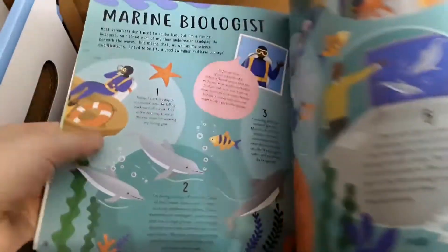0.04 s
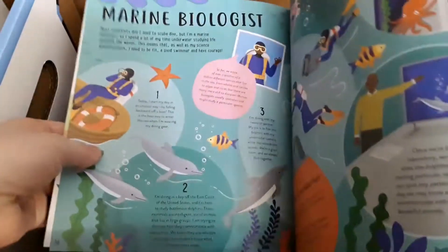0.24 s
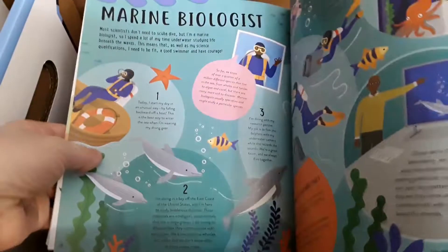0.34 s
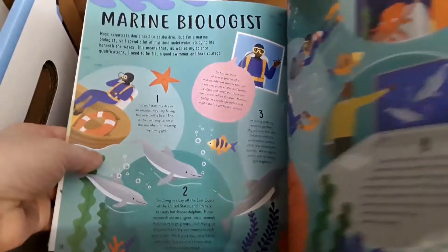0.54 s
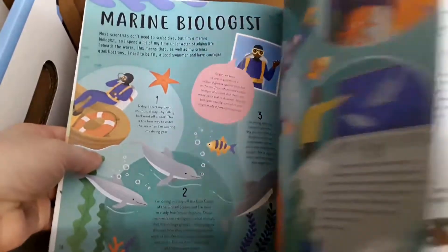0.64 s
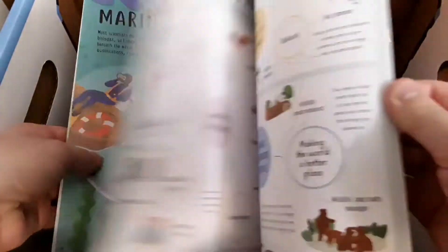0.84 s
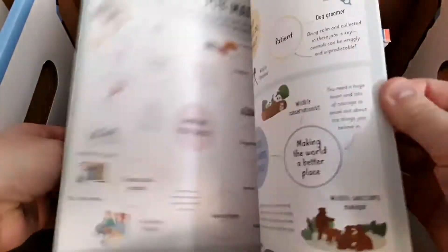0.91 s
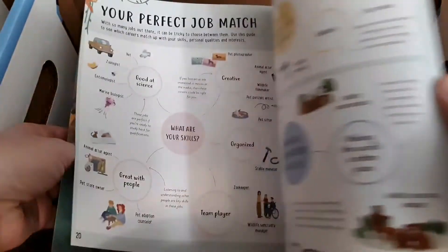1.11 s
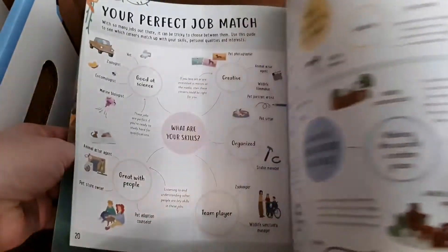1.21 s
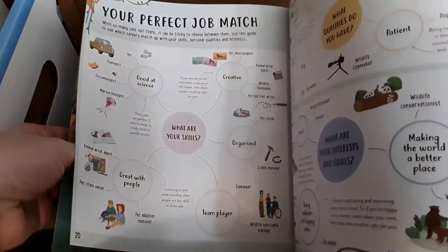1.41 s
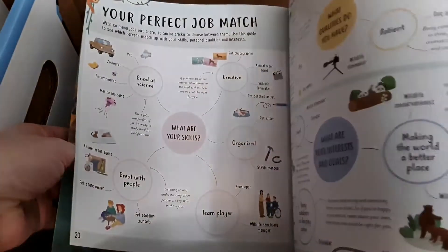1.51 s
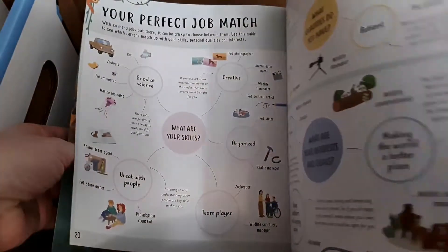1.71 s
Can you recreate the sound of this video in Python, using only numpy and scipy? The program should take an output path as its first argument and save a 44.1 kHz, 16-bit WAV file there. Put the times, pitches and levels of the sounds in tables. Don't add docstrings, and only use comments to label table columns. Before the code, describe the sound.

Pages of a small book are turned close to the microphone: a quick rustle with a firm low thump and crack, light taps, then a puffing page flap and faint final taps in a quiet room.

```python
import sys
import numpy as np
from scipy import signal
from scipy.fft import rfft, irfft
from scipy.io import wavfile
from scipy.ndimage import uniform_filter1d

SR = 44100
rng = np.random.default_rng(int(sys.argv[2]) if len(sys.argv) > 2 else 0)


def log_audio(samples):
    frames = np.atleast_2d(samples).T
    limited = np.clip(frames, -1, 1)
    pcm = np.round(limited * 32767).astype(np.int16)
    wavfile.write(sys.argv[1], SR, pcm)


def ratio_of_db(decibels):
    return 10 ** (np.asarray(decibels, float) / 20)


N = 77175


def evened(x):
    return x / np.sqrt(np.mean(x ** 2) + 1e-20)


def read(points, hz):
    f, value = np.transpose(points)
    return np.interp(np.log(hz + 1), np.log(f + 1), value)


def colour(x, points):
    gain_db = read(points, np.fft.rfftfreq(len(x), 1 / SR))
    return irfft(rfft(x) * ratio_of_db(gain_db), len(x))


def add(mix, s, sound):
    part = mix[round(s * SR):][:len(sound)]
    part += sound[:len(part)]


def resonate(x, hz, width):
    turn = np.exp(2j * np.pi * hz * np.arange(len(x)) / SR)
    r = np.exp(-np.pi * width / SR)
    return 2 * (turn * signal.lfilter([1 - r], [1, -r], x / turn)).real


def resonate_twice(x, hz, width):
    return resonate(resonate(x, hz, width), hz, width)


def dulled(x, dull_db):
    # frequency in Hz, gain of the radiated spectrum in dB.
    paper_spectrum = [(150, 13.5), (500, 10), (1500, 8.5), (3000, 1.5), (5500, -2), (8500, 2.5),
                      (12000, -2), (15500, -16)]
    dull_hz = 6374
    x = colour(x, paper_spectrum)
    low = signal.filtfilt(*signal.butter(2, dull_hz, fs=SR), x)
    return x + (ratio_of_db(dull_db) - 1) * low


def patchy(x):
    patch_db = 2.2
    z = signal.stft(x, nperseg=256)[2]
    lumps = uniform_filter1d(rng.standard_normal(z.shape), size=3, axis=0)
    lumps = evened(uniform_filter1d(lumps, size=10, axis=1))
    return signal.istft(z * ratio_of_db(patch_db * lumps), nperseg=256)[1][:N]


def burst(length, noise):
    t = np.arange(len(noise)) / SR
    attack = np.minimum(t / 0.0004, 1)
    return noise * attack * np.exp(-(t / length) ** 1.6)


def rub():
    # time in seconds, rub level in dB, dullness in dB.
    stroke = [(0, -68.5, 10), (0.043, -61, 11.5), (0.088, -73.5, 8), (0.138, -71.5, 7), (0.201, -55.5, 6.5),
              (0.208, -47.5, 8.5), (.326, -55.5, -1), (0.383, -72.5, 6.5), (.49, -73.5, 3.5),
              (.56, -67, 3.5), (.655, -89, 10), (.76, -84, 10.5), (.86, -83.5, 13.5), (1.019, -88.5, 9.5),
              (1.025, -65.5, 3), (1.113, -61.5, 2.5), (1.143, -81, 7), (1.3, -104, 24), (1.42, -112, 27)]
    grains_per_s, grain_db, grain_share = 2200, -1.5, 0.3146
    s, level_db, dull_db = np.transpose(stroke)
    t = np.arange(N) / SR
    slip_now = rng.random(N) < grains_per_s / SR
    slips = slip_now * ratio_of_db(grain_db * np.minimum(rng.exponential(1, N), 5))
    catch = evened(uniform_filter1d(slips, size=50))
    drive = rng.standard_normal(N) * (1 - grain_share + grain_share * catch)
    sheet = dulled(evened(patchy(drive)), np.interp(t, s, dull_db))
    return ratio_of_db(np.interp(t, s, level_db)) * sheet


def snaps():
    # start in seconds, level in dB, length in seconds, dullness in dB.
    cracks = [(0.0305, -53.5, 0.0022, -1.5), (0.038, -51.5, 0.0041, -10), (0.16, -56, .012, 1.5),
              (.2054, -30, .0028, -2), (0.2365, -44, 0.009, 8), (.211, -42, .002, -5),
              (.2315, -50, .003, 12), (0.5065, -55, 0.0035, -3), (0.5252, -49, 0.0025, -6),
              (.5325, -57, .002, -12), (.5435, -52, .002, -8), (.5454, -41, 0.0013, -14),
              (.2375, -43, .008, 11), (0.56, -64, .003, 5), (.553, -58, 0.0038, -8),
              (0.034, -62, 0.0045, -9), (1.068, -61, 0.0028, 2), (1.0251, -56.5, 0.011, 3.5),
              (.633, -66, 0.0013, 7), (0.7738, -60, 0.001, -15), (0.7975, -59, 0.002, -6),
              (0.8512, -66, .002, -18), (1.6908, -65, 0.0021, 3), (1.6425, -90, 0.002, 22),
              (1.7405, -71, 0.003, -6), (1.584, -92, .002, 22)]
    top_hz = 12400
    out = np.zeros(N)
    noise = rng.standard_normal((len(cracks), 2048))
    for (s, db, length, dull_db), v in zip(cracks, noise):
        add(out, s, ratio_of_db(db) * burst(length, dulled(v, dull_db)))
    return signal.lfilter(*signal.butter(1, top_hz, fs=SR), out)


def knocks():
    # start in seconds, level in dB, blow length in seconds.
    blows = [(0.03052, -43.5, 0.00023), (0.03296, -43, 0.00024), (0.0362, -49, 0.00028),
             (0.2357, -41.5, 0.00034), (.2415, -34, 0.00025), (0.2104, -23, 0.0004), (1.6428, -57, .0003),
             (1.584, -58, .0003), (0.521, -45.5, 0.00104), (0.5187, -42, 0.000335), (0.635, -54, 0.00053),
             (0.924, -74.5, 0.00236), (1.5845, -49, 0.0011), (1.592, -52.5, 0.0024),
             (1.6404, -50.5, 0.00123), (1.694, -63.5, 0.00115), (1.6908, -46, 0.000626)]
    # frequency in Hz, level in dB, 60 dB decay time in seconds.
    modes = [(318.9, 1, 0.0275), (497.8, -7, 0.01453), (779.9, -4, 0.0201), (1107.6, -10, 0.0242),
             (1678.7, -14, 0.044), (2206, -18, 0.02169)]
    out = np.zeros(N)
    t = np.arange(SR // 4) / SR
    ring = sum(ratio_of_db(db - 60 * t / t60) * np.sin(2 * np.pi * hz * t) for hz, db, t60 in modes)
    for s, db, length in blows:
        blow = np.exp(-0.5 * ((t[:600] - 2 * length) / (length / 4)) ** 2)
        add(out, s - 2 * length, ratio_of_db(db) * signal.oaconvolve(ring, blow / blow.sum()))
    return signal.lfilter(*signal.butter(2, 150, "high", fs=SR), out)


def flap():
    # start in seconds, level in dB, length in seconds.
    puffs = [
        (1.0319, -40.5, 0.00614),
        (1.0356, -31.5, 0.00548),
        (1.041, -41.5, 0.00837),
        (1.0455, -38, 0.0051),
        (1.0519, -30, 0.00493),
        (1.058, -33, 0.00605),
        (1.0692, -39.5, 0.01),
        (1.062, -40, 0.0069),
        (1.079, -52, 0.0147),
    ]
    # frequency in Hz, width in Hz, level in dB.
    pocket = [(406.2, 224, -7.5), (1002.3, 192, 1.5), (1176, 185, -7.5), (1422, 262, -7), (1980, 980, -31),
              (830.5, 128, -11.5)]
    puff_db, pop_db, widening = 12.5, 17.5, 1.636
    drive = np.zeros(N)
    noise = rng.standard_normal((len(puffs), 4096))
    for (s, db, length), v in zip(puffs, noise):
        add(drive, s, ratio_of_db(db + puff_db) * burst(length, v))
        add(drive, s, ratio_of_db(db + pop_db) * np.hanning(16))
    out = np.zeros(N)
    for k, (hz, width, db) in enumerate(pocket):
        sign = (-1) ** k
        out += sign * ratio_of_db(db) * resonate_twice(drive, hz, widening * width)
    return out


def edges():
    # start in seconds, length in seconds, level in dB,
    # pitch in Hz, width in Hz.
    tuned_noises = [(.363, 0.022, -72, 2750, 200), (.555, 0.075, -73, 3350, 200), (.548, .04, -78, 12200, 600),
                    (.1, .04, -80, 5300, 500), (.524, .012, -62, 10000, 900), (.51, .05, -62, 650, 500),
                    (.3, .08, -62, 550, 300), (.04, .04, -72, 4500, 2000), (0.782, 0.032, -72.5, 2270, 1300),
                    (.83, 0.092, -72.5, 2680, 580), (0.83, 0.15, -80.5, 3600, 350),
                    (0.76, 0.23, -88.5, 8450, 570), (.848, 0.022, -83, 8300, 350), (1.55, .18, -78, 530, 480),
                    (1.57, 0.18, -89, 2000, 1500), (.93, 0.071, -74.5, 1900, 740),
                    (1.066, .014, -68, 5360, 230), (1.09, 0.045, -62.5, 2780, 280),
                    (1.022, .025, -66, 2950, 400), (1.085, .03, -72, 5400, 230), (.232, .016, -52, 4700, 500),
                    (.235, .03, -50, 1620, 200), (1.09, 0.043, -67.5, 3430, 280),
                    (1.08, 0.029, -57.5, 2070, 500)]
    out = np.zeros(N)
    noise = rng.standard_normal((len(tuned_noises), 8192))
    for (s, length, db, hz, width), v in zip(tuned_noises, noise):
        swell = np.sin(np.pi * np.minimum(np.arange(8192) / SR / length, 1))
        add(out, s, ratio_of_db(db) * swell * evened(resonate_twice(v, hz, width)))
    return out


def shudders():
    # start in seconds, level in dB, free time in seconds, pitch in Hz, level slope in dB/s.
    panel_tones = [(.0301, -39.5, 0.00354, 802, -200), (.55, -56, 0.042, 255, -150),
                   (0.186, -49.5, 0.0204, 339, -3.5), (0.1665, -56.5, 0.02, 110, 2),
                   (.207, -55.5, 0.032, 58, -100), (0.355, -66.5, 0.039, 48, -58.5),
                   (0.032, -51.5, 0.003, 294, -200), (0.3026, -43.5, 0.0255, 344, -100),
                   (.211, -29.5, 0.0048, 550, -200), (.035, -48, 0.021, 131, -150),
                   (0.1482, -58, 0.0327, 262, 199), (0.1846, -41, 0.0077, 283.5, 0.5),
                   (.2104, -19.5, 0.016, 273, -61), (.0303, -43, .003, 1250, -200),
                   (.0312, -46, .003, 1900, -200), (0.2133, -30, 0.0536, 128, -100),
                   (0.2243, -30.5, 0.0173, 343.7, -300), (0.2358, -35.5, 0.1204, 272, -110),
                   (0.2735, -35.5, 0.0454, 129.1, -100), (0.4004, -58.5, 0.0541, 126.5, 0),
                   (0.5162, -43, 0.078, 128.7, -150), (0.5177, -49, 0.026, 310.7, -100),
                   (0.523, -47, 0.0205, 276.2, -100), (0.79, -60, 0.0477, 115.3, -2),
                   (1.022, -53, 0.01, 122.2, 1.5), (1.046, -48, 0.015, 275.7, -100),
                   (1.085, -54, 0.0207, 122.7, -150)]
    rise_turns, damp_turns = 0.372, 1.432
    out = np.zeros(N)
    t = np.arange(SR // 4) / SR
    for s, db, free, hz, slope in panel_tones:
        rise = np.sin(np.pi / 2 * np.minimum(t * hz / rise_turns, 1)) ** 2
        damping = np.exp(-(np.maximum(t - free, 0) * hz / damp_turns) ** 2)
        level = ratio_of_db(db + slope * np.minimum(t, free))
        add(out, s, level * rise * damping * np.sin(2 * np.pi * hz * t))
    return out


def room(x):
    # frequency in Hz, 60 dB decay time in seconds.
    decay_times = [(150, 0.649), (1000, 0.31), (4000, 0.392), (12000, 0.199)]
    taps = np.zeros(SR // 2)
    at = np.arange(200, SR // 2 - 20, 20)
    taps[at + rng.integers(0, 20, len(at))] = rng.choice([-1., 1.], len(at))
    hz, t, z = signal.stft(taps, SR, nperseg=256)
    decay = ratio_of_db(-60 * t / read(decay_times, hz)[:, None])
    tail = signal.istft(z * decay, SR, nperseg=256)[1]
    return signal.fftconvolve(x, tail / np.linalg.norm(tail))[:N]


def air():
    # frequency in Hz, gain of the room noise in dB.
    air_spectrum = [(30, -4.5), (70, 4), (200, 0), (500, -5), (1200, -17.5), (3000, -31), (6000, -56.5),
                    (15000, -57.5)]
    air_db, hum_db = -68, -67.5
    hum = resonate_twice(rng.standard_normal(N), 122.05, 13.05)
    noise = colour(rng.standard_normal(N), air_spectrum)
    return ratio_of_db(air_db) * evened(noise) + ratio_of_db(hum_db) * evened(hum)


def scene():
    room_db = -14
    book = rub() + snaps() + knocks() + flap() + edges()
    return (book + ratio_of_db(room_db) * room(book) + shudders() + air())[None]


def low_pass(x):
    return signal.sosfilt(signal.butter(12, 15770, fs=SR, output="sos"), x)


def record(dry):
    hiss_db, circuit_db = -101, -90.5
    port_hz, port_width, port_db = 8502, 462, 12.5
    skirt_width, skirt_db = 2353, 5
    x = dry[0] + ratio_of_db(hiss_db) * rng.standard_normal(N)
    x = signal.lfilter(*signal.butter(2, 45, "high", fs=SR), x)
    port = ratio_of_db(port_db) * resonate_twice(x, port_hz, 1.963 * port_width)
    skirt = ratio_of_db(skirt_db) * resonate_twice(x, port_hz, skirt_width)
    x = x + port + skirt + ratio_of_db(circuit_db) * rng.standard_normal(N)
    band_limit = signal.firwin(511, 15750, window=("kaiser", 9), fs=SR)
    x = signal.oaconvolve(x, band_limit, "same")
    return low_pass(x[None])


dry = scene()
out = record(dry)
log_audio(out)
```